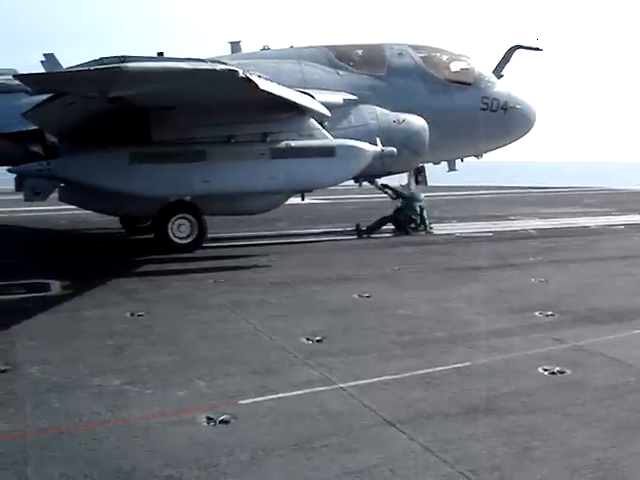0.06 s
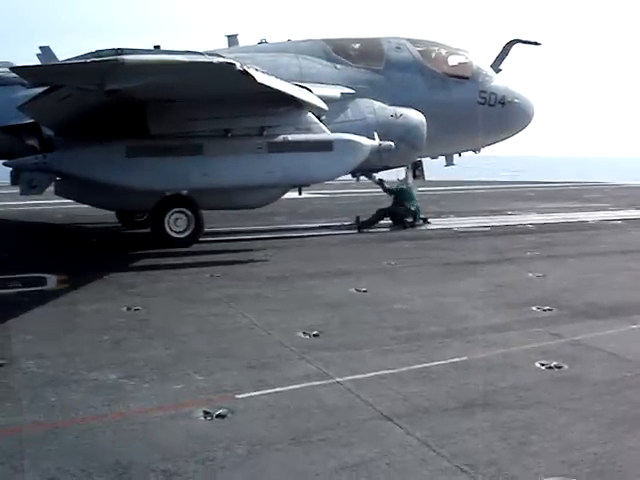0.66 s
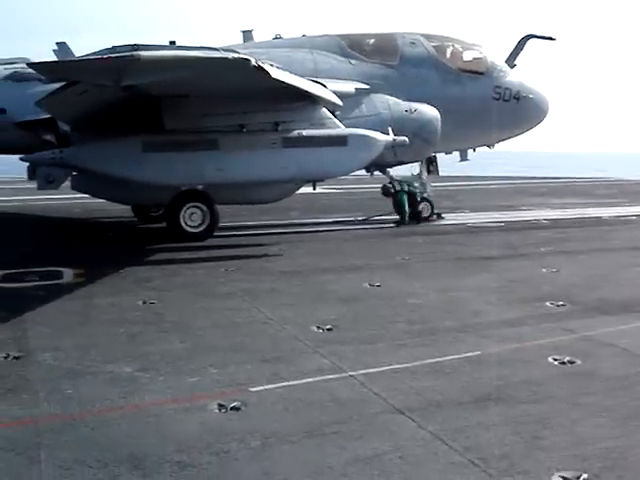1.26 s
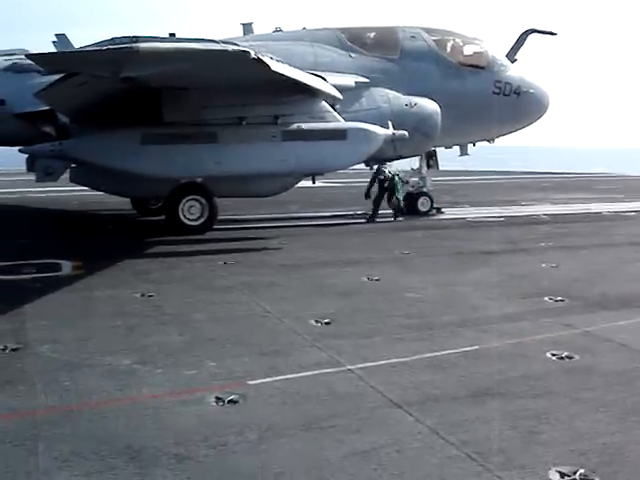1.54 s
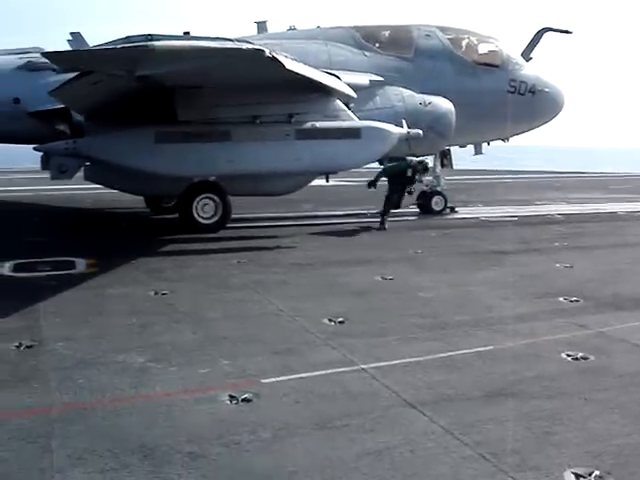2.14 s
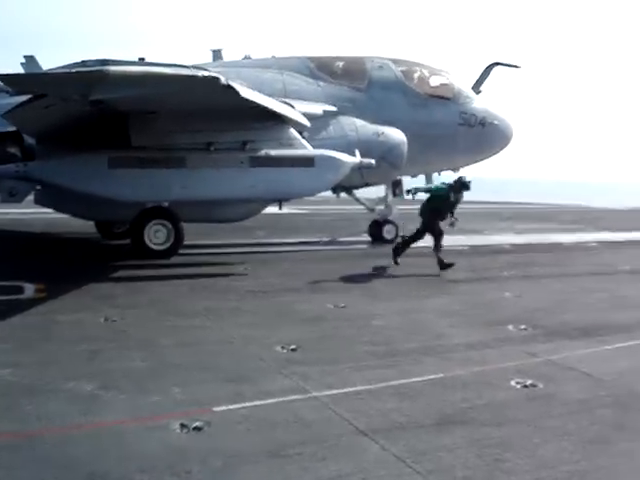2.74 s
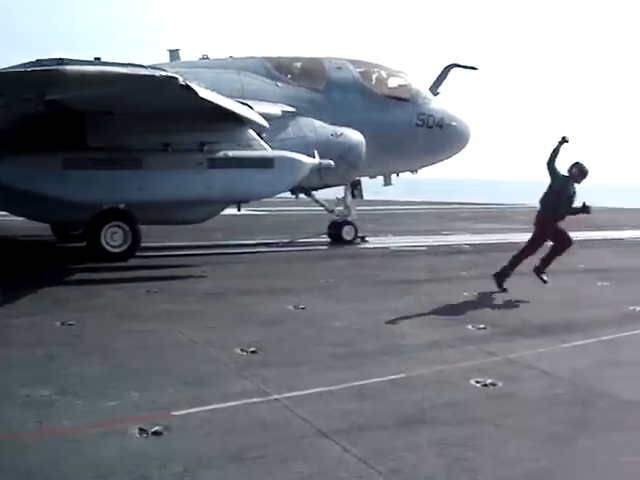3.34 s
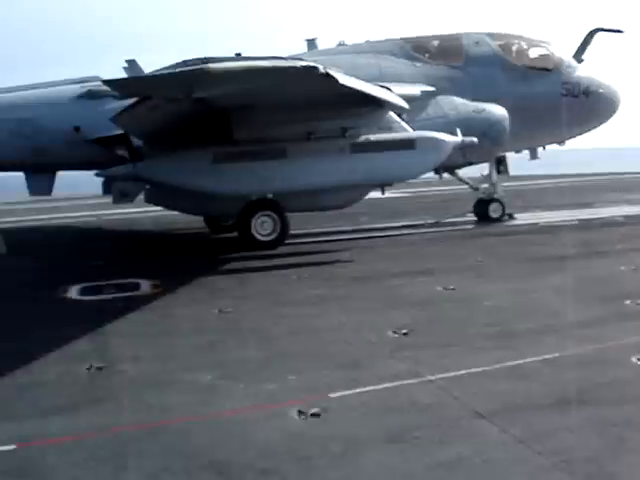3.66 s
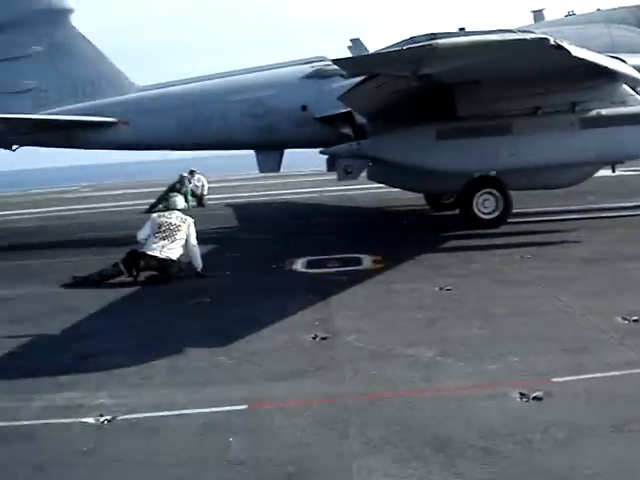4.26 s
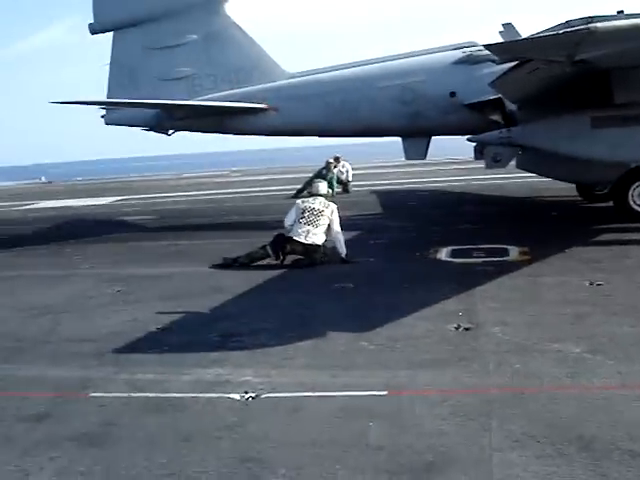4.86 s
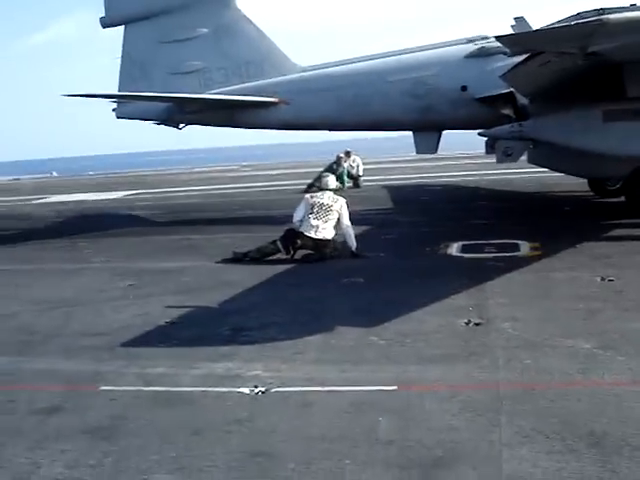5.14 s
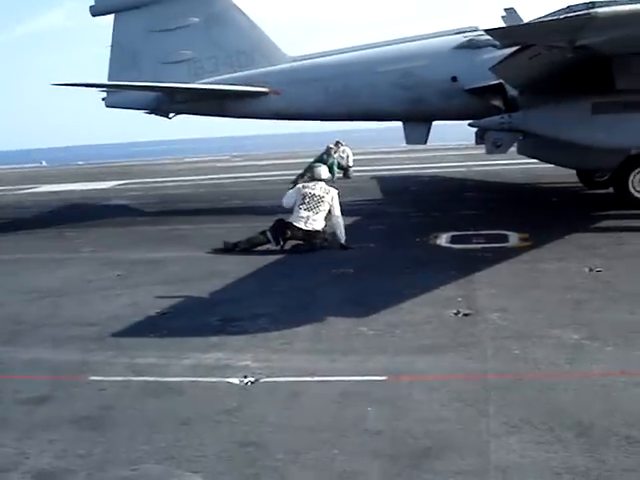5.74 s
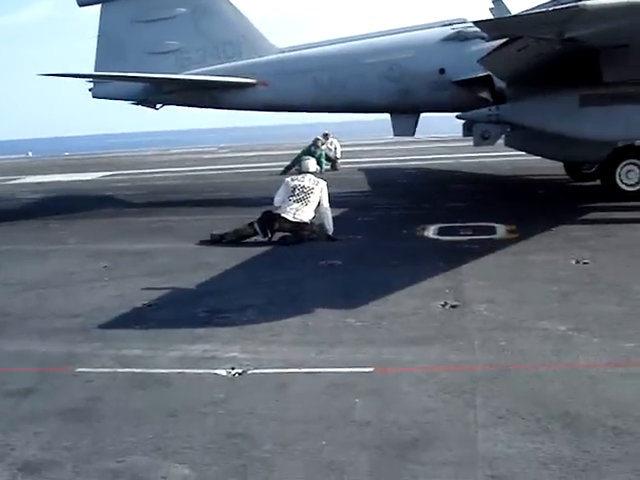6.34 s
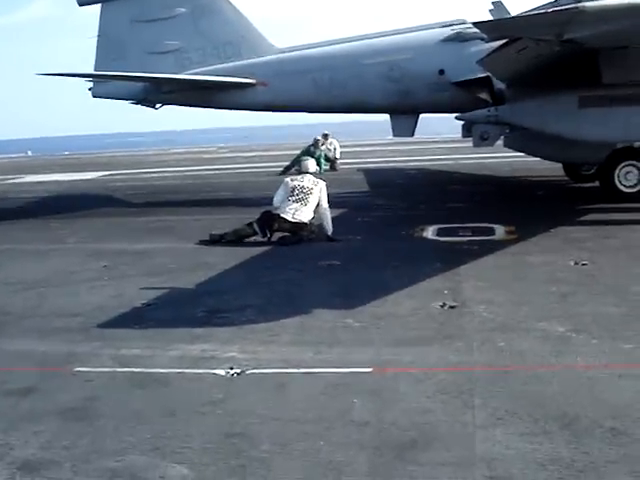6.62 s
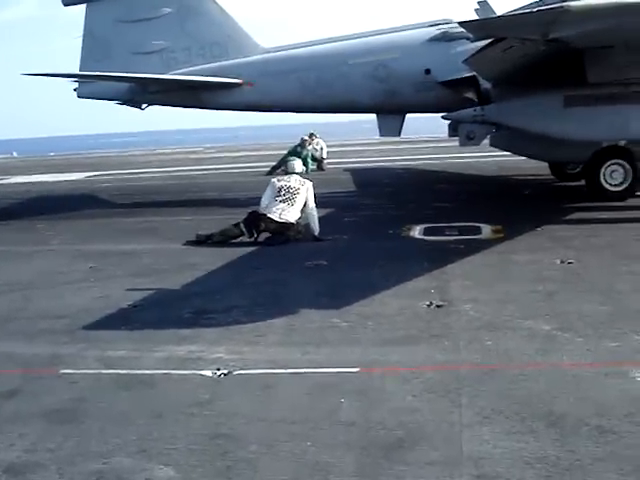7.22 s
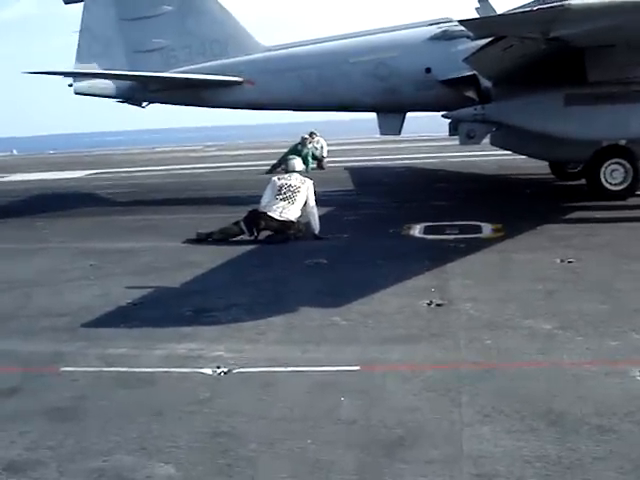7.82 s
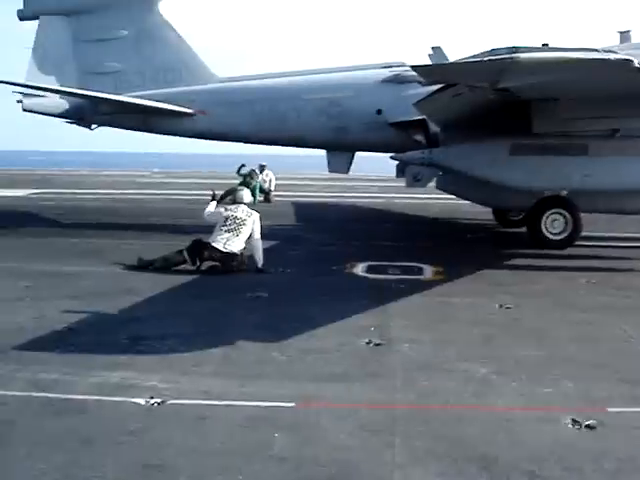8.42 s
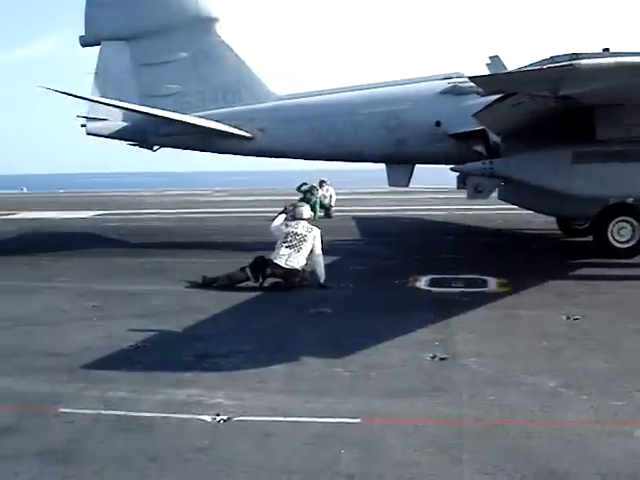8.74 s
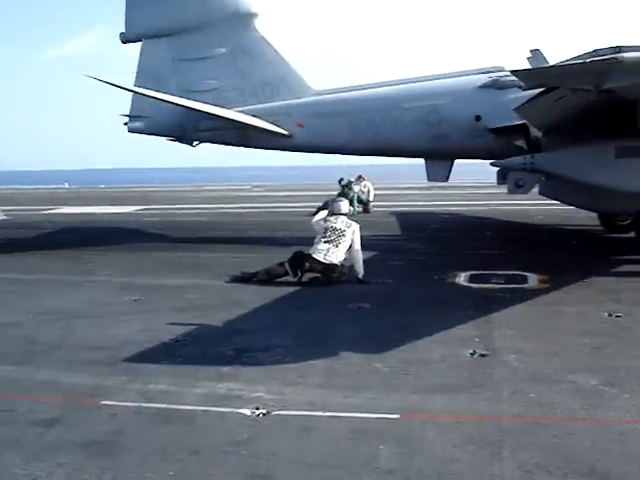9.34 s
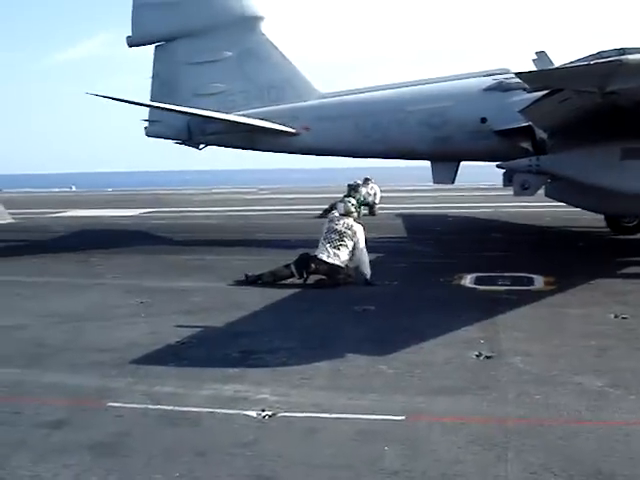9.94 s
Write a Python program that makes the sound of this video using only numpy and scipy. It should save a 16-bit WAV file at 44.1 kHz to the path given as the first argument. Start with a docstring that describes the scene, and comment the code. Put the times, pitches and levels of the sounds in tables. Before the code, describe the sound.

A jet aircraft runs up its engines on a ship's flight deck, heard from close beside the wing. High turbine whines climb over a loud, hollow roar and gradually sink into it. A rough howl rises and passes after about two seconds. The roar then brightens into a harsh, even rush that holds at full power to the end. Air rumbles faintly on the microphone.

```python
"""Compressor whines climb over a hollow roar: a twin-engine jet runs up to full power on a carrier's
flight deck, heard from beside the wing. The blade tones rise with shaft speed and sink into the roar,
a duct howl passes, then the turbulent exhaust opens into a harsh, even rush.
The steel deck reflects the noise, and air buffets the single microphone."""
import sys
import numpy as np
from scipy import signal
from scipy.fft import rfft, irfft
from scipy.io import wavfile
from scipy.ndimage import uniform_filter1d

SR = 44100
rng = np.random.default_rng(int(sys.argv[2]) if len(sys.argv) > 2 else 0)


def materialize(psi):
    """Save the field psi as 16-bit PCM at rate SR to the path in sys.argv[1].

    A 1-D psi becomes a single channel; in a 2-D psi each row is a channel.
    """
    bounded = np.clip(np.atleast_2d(psi).T, -1, 1)
    quanta = np.round(bounded * 32767).astype(np.int16)
    wavfile.write(sys.argv[1], SR, quanta)


N = 440548
TIME = np.arange(N) / SR


def gain_of(db):
    """Amplitude ratio of a level in decibels."""
    return 10 ** (np.asarray(db) / 20)


def unit_rms(x):
    """Normalisation to an rms of 1."""
    return x / np.sqrt(np.mean(x ** 2) + 1e-20)


def curve_at(table, t):
    """Linear interpolation of a two-column curve at the times t."""
    return np.interp(t, *np.transpose(table))


def spectrum_at(points, hz):
    """Linear interpolation of levels over log frequency."""
    point_hz, db = np.transpose(points)
    return np.interp(np.log(hz + 1), np.log(point_hz + 1), db)


def bell(x, centre, width):
    """Gaussian of height 1, given its full width at half height."""
    return 2 ** -((2 * (x - centre) / width) ** 2)


def wander(rate_hz):
    """Low-pass noise of rms 1: a random fluctuation up to about rate_hz."""
    hz = np.fft.rfftfreq(N, 1 / SR)
    return unit_rms(irfft(rfft(rng.standard_normal(N)) / (1 + (hz / rate_hz) ** 4), N))


def eddies(shape, frames, bins):
    """Moving averages correlate noise into patches over time and frequency, rms 1."""
    field = uniform_filter1d(rng.standard_normal(shape), size=frames, axis=0)
    return unit_rms(uniform_filter1d(field, size=bins, axis=1))


def turbulent_tone(hz, jitter, jitter_hz, fade_db, fade_hz):
    """Turbulence modulates a tone at random in frequency and amplitude; rms 1."""
    cycles = np.cumsum(hz * (1 + jitter * wander(jitter_hz))) / SR
    return unit_rms(np.sin(2 * np.pi * cycles) * gain_of(fade_db * wander(fade_hz)))


# Air on the microphone: time_s, level_db
BUFFET_LEVELS = [(0, -67), (2.1, -66), (3.3, -51), (4.0, -66), (4.7, -57), (9.99, -55)]


def buffet(gust_db=2, low_cut_hz=22):
    """Pressure fluctuations of moving air make a lumpy rumble; the microphone loses the deepest part."""
    low_cut = signal.butter(1, low_cut_hz, "highpass", fs=SR, output="sos")
    rumble = signal.sosfilt(low_cut, wander(rate_hz=85))
    gusts = gain_of(gust_db * wander(rate_hz=5))
    return unit_rms(rumble * gusts) * gain_of(curve_at(BUFFET_LEVELS, TIME))


def duct_howl(start_s=2.1, attack_s=0.2, hold_s=0.95, release_s=0.4, level_db=-33.5, octave_db=-6):
    """A rough duct tone and its second harmonic sound as the engine passes through high power."""
    age = TIME - start_s
    pitch_hz = np.interp(age, [0, 0.52], [1258, 1412])  # glides up, then settles
    envelope = np.interp(age, np.cumsum([0, attack_s, hold_s, release_s]), [0, 1, 1, 0])
    fundamental, octave = (
        turbulent_tone(pitch_hz * k, jitter=0.0115, jitter_hz=60, fade_db=2.5, fade_hz=20)
        for k in (1, 2))
    return gain_of(level_db) * envelope * (fundamental + gain_of(octave_db) * octave)


# Tones of the compressor stages: ratio_to_main_tone, relative_level_db
BLADE_TONES = [(.755, -9), (1, 0), (1.087, -6), (1.178, -8), (1.506, -3.5), (1.75, -9), (2.405, -10.5)]
# Brief flares of the main blade tone: centre_s, width_s, level_db
BLADE_WHISTLES = [(.23, .06, -35), (.42, .15, -33), (.84, .05, -33.5), (1.01, .12, -35), (1.44, .11, -36),
                  (2.11, .07, -38)]


def compressor(start_hz=3480, top_hz=5240, start_db=-38, sink_db_per_s=4, others_db=3.0):
    """Blade-passing tones are proportional to shaft speed, so they climb together as they fade."""
    main_hz = np.minimum(start_hz + 297 * TIME ** 1.58, top_hz)  # ever faster, up to full shaft speed
    whine = gain_of(start_db - sink_db_per_s * TIME)
    whistles = sum(gain_of(db) * bell(TIME, s, width) for s, width, db in BLADE_WHISTLES)
    sound = np.zeros(N)
    for ratio, db in BLADE_TONES:
        envelope = whine + whistles if ratio == 1 else whine * gain_of(others_db)
        fade_db = 1 if ratio == 1 else 4
        tone = turbulent_tone(main_hz * ratio, jitter=0.0012, jitter_hz=50, fade_db=fade_db, fade_hz=6)
        sound += gain_of(db) * envelope * tone
    return sound


# The run-up: time_s, thrust_stage (0 part power, 1 high power, 2 near full, 3 full power)
THRUST_CURVE = [(0, 0), (1.3, 0.22), (2.2, 0.65), (3.3, 1.03), (4.15, 1.7), (4.5, 2.5), (5.25, 3)]
# Exhaust spectrum at each stage: frequency_hz, relative_density_db
PART_POWER_SPECTRUM = [(25, -29), (60, -26), (100, -12.5), (145, -10), (185, -5.5), (380, -6.5),
                       (570, -1.5), (660, -6.5), (1100, -3.5), (1700, -6.5), (2100, -9.5), (5000, -9.5),
                       (7500, -17), (10000, -18.5)]
HIGH_POWER_SPECTRUM = [(25, -25), (70, -23.5), (145, -14.5), (200, -5.5), (340, -3.5), (530, -10),
                       (720, -1), (1150, -0.5), (1680, -1.5), (2050, -7.5), (3000, -7), (5200, -9),
                       (7500, -15.5), (10000, -21.5)]
NEAR_FULL_SPECTRUM = [(25, -30), (80, -27), (160, -22), (270, -13), (440, -6.5), (540, -8), (800, -5.5),
                      (1800, -2.5), (2650, -3.8), (3800, -2.8), (4900, -7), (6300, -8), (7700, -11.5),
                      (10000, -18.5)]
FULL_POWER_SPECTRUM = [(25, -25.5), (150, -22.5), (300, -18), (450, -14), (750, -10), (1300, -7),
                       (2000, -6), (3100, -5.5), (4500, -5.5), (6000, -8), (7300, -9), (8800, -12),
                       (10000, -17.5)]
# The roar and its main resonance, one row a stage: level_db, resonance_hz, resonance_height_db
ROAR_STAGES = [(-19, 826, 7), (-18, 904, 3.5), (-16.8, 1030, 2), (-18, 1034, 3)]
# Brief swells of that resonance: centre_s, width_s, added_height_db
ROAR_SWELLS = [(1.1, .55, 0.5), (4.1, 0.39, 3), (8.67, .28, 3.5)]
# Broad peaks and dips of the engine ducts: centre_hz, width_hz, height_db
DUCT_RESONANCES = [(1297, 170, -2.5), (2380, 250, 2), (2850, 200, 2), (3280, 400, 1), (3940, 300, -3),
                   (4420, 300, 0), (4820, 250, -2), (5340, 550, 1), (6700, 500, 0.5)]
# Comb filter of the deck reflection: time_s, spacing_hz
DECK_COMB = [(0, 1710), (8.3, 1794), (9.6, 2150)]


def exhaust(roar_width_hz=260, deck_db=0.6, eddy_db=0.54, surge_db=0.31, flutter_db=0.67, top_hz=10281.6):
    """Turbulent mixing radiates broadband noise: a hollow roar that brightens to a rush as thrust rises."""
    size, hop = 2048, 512
    frame_s = np.arange(N // hop + 2) * hop / SR
    t, hz = frame_s[:, None], np.fft.rfftfreq(size, 1 / SR)
    # thrust sets the level, the resonance and the blend of spectra
    thrust = curve_at(THRUST_CURVE, t)
    spectra = [PART_POWER_SPECTRUM, HIGH_POWER_SPECTRUM, NEAR_FULL_SPECTRUM, FULL_POWER_SPECTRUM]
    stages = np.arange(len(spectra))
    shares = [np.maximum(1 - abs(thrust - stage), 0) for stage in stages]
    level_db, roar_hz, roar_db = (np.interp(thrust, stages, col) for col in np.transpose(ROAR_STAGES))
    roar_db += sum(height * bell(t, s, width) for s, width, height in ROAR_SWELLS)
    db = sum(share * spectrum_at(spectrum, hz) for share, spectrum in zip(shares, spectra))
    db += roar_db * bell(hz, roar_hz, roar_width_hz)
    ducts_db = sum(height * bell(hz, centre, width) for centre, width, height in DUCT_RESONANCES)
    db += (shares[0] + shares[1]) * ducts_db  # masked near full power
    # direct and deck-reflected sound interfere in evenly spaced bands
    db += deck_db * np.cos(2 * np.pi * hz / curve_at(DECK_COMB, t))
    # hot, moving air makes patches of the spectrum swell and fade
    db += eddy_db * eddies(db.shape, frames=12, bins=30)
    colour = gain_of(db) * (hz < top_hz)
    colour /= np.linalg.norm(colour, axis=1, keepdims=True)  # equal power in every frame
    white = rng.standard_normal(db.shape) + 1j * rng.standard_normal(db.shape)
    _, noise = signal.istft((colour * white).T, nperseg=size, noverlap=size - hop)
    # the jet surges at part power and steadies at full power
    unsteadiness = 1 - 0.5 * np.interp(TIME, frame_s, shares[-1][:, 0])
    swell_db = unsteadiness * (surge_db * wander(rate_hz=13) + flutter_db * wander(rate_hz=65))
    return unit_rms(noise[:N]) * gain_of(np.interp(TIME, frame_s, level_db[:, 0]) + swell_db)


def scene():
    """Superposition: all sources add at one microphone, which feeds both channels."""
    mono = exhaust() + compressor() + duct_howl() + buffet()
    return np.array([mono, mono])


def record(dry, ceiling=1.2, cutoff_hz=10080):
    """Soft saturation rounds the tallest peaks; a steep low-pass filter then limits the band."""
    rounded = ceiling * np.tanh(dry / ceiling)
    low_pass = signal.firwin(1023, cutoff_hz, window=("kaiser", 9), fs=SR)
    return signal.oaconvolve(rounded, low_pass[None], "same")


dry = scene()
out = record(dry)
materialize(out)
```